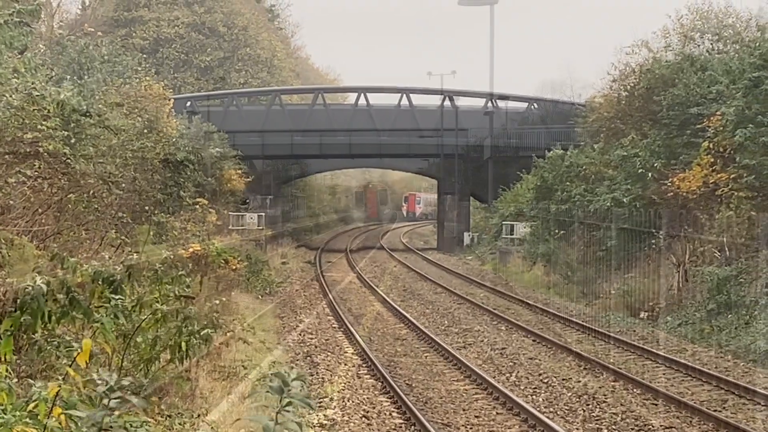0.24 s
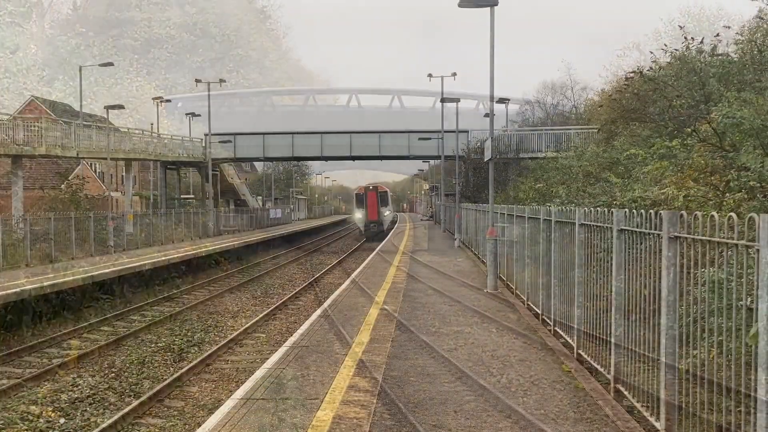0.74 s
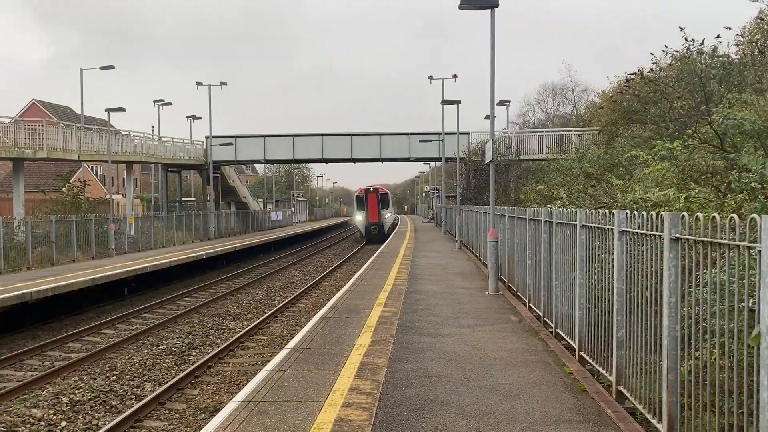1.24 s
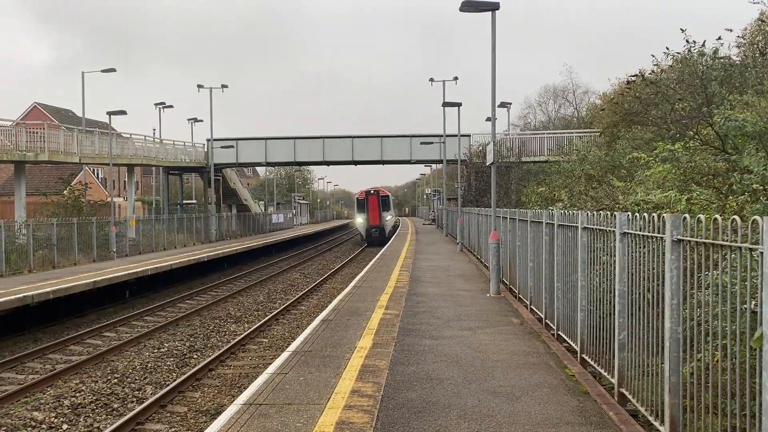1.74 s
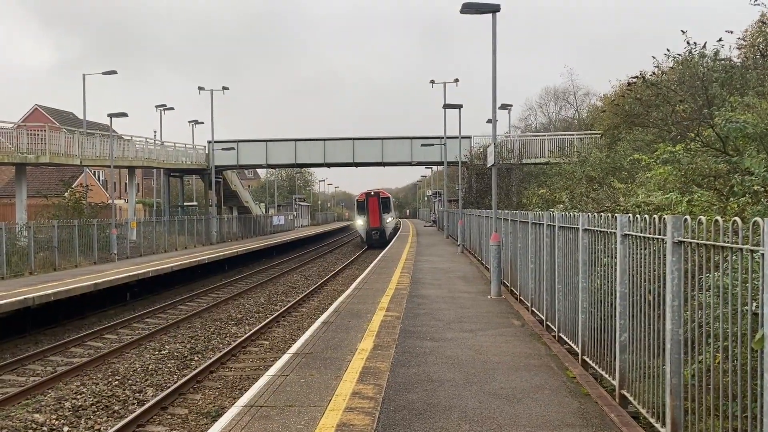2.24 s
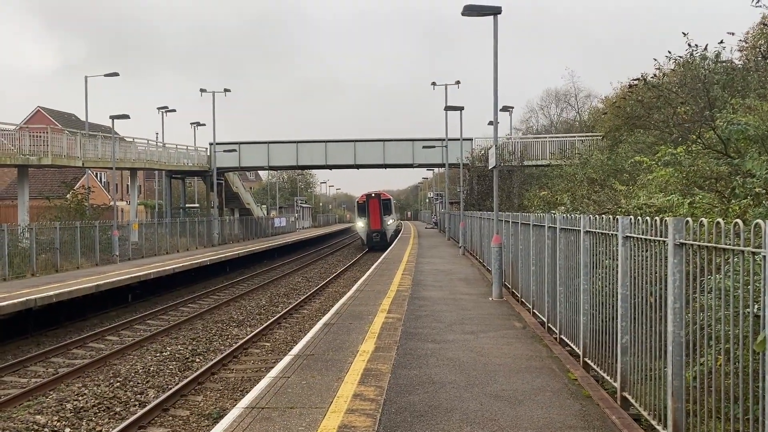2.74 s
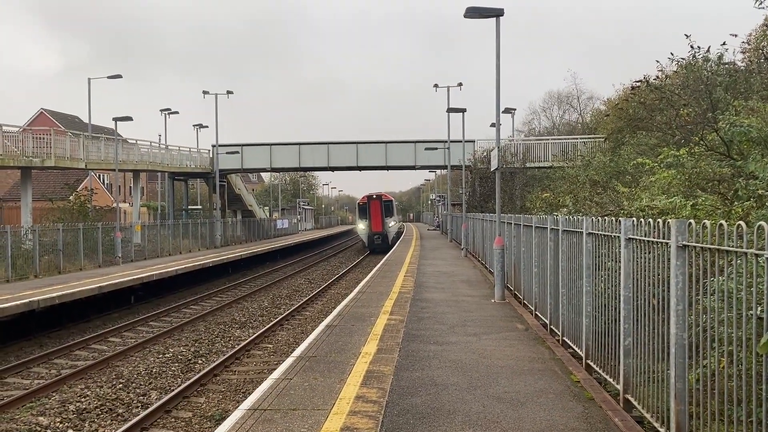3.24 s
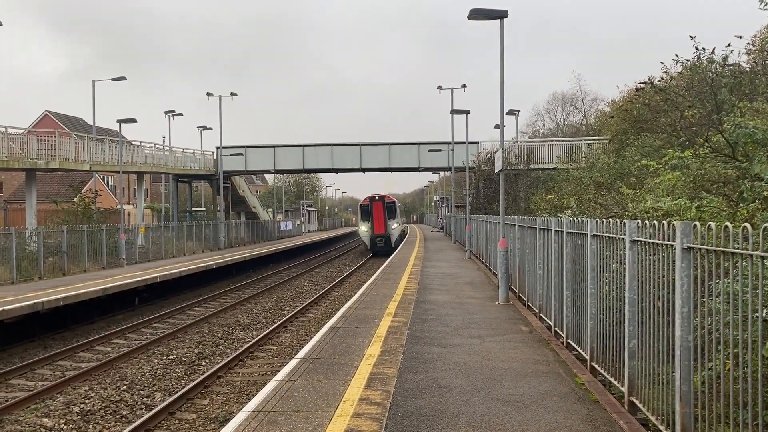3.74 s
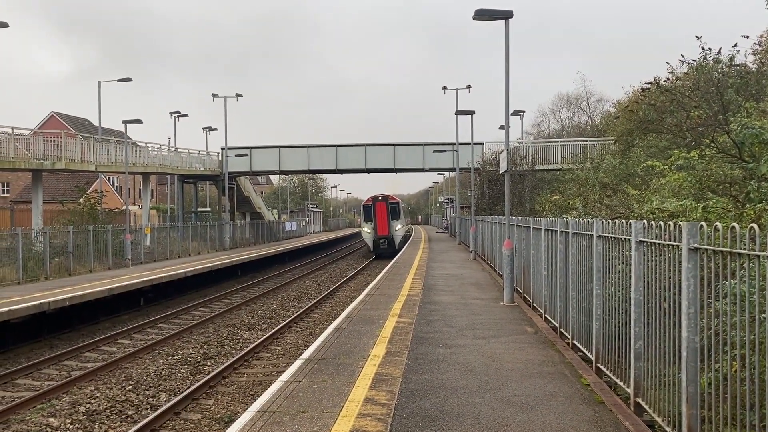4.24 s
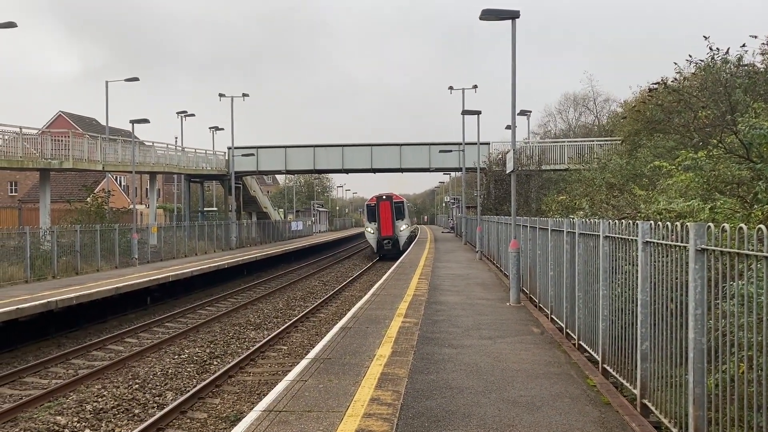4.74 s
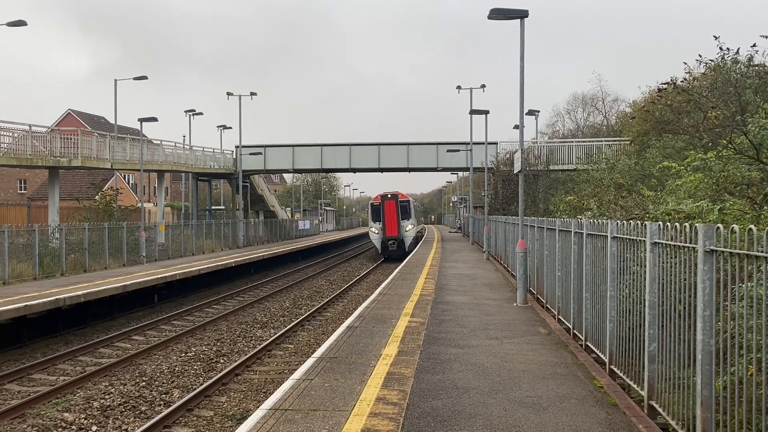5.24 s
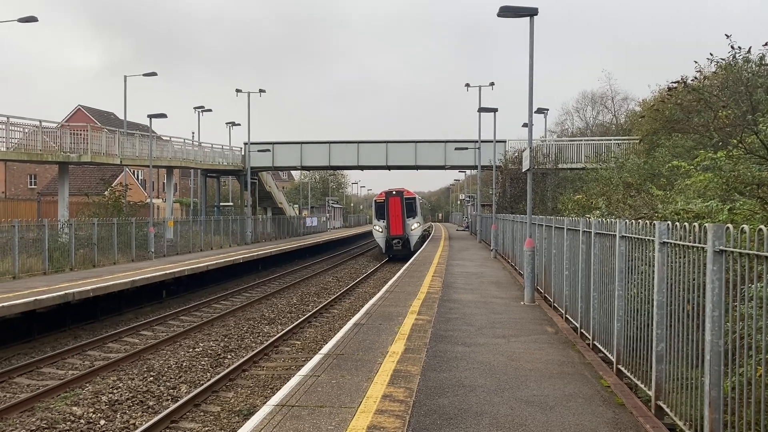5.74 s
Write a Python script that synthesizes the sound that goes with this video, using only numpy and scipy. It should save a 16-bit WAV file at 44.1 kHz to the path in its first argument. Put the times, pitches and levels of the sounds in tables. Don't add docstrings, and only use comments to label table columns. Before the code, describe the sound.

Outdoors, faint distant traffic and low wind thumps open the scene and dissolve within a second into a station platform. A diesel railcar works toward the listener, its two slightly detuned engines throbbing, climbing in pitch, then levelling. Wheel and exhaust roar, wavering fan hum and a very faint late whistle join in. Dry plastic ticks from the hand-held phone sound close; the train never passes.

```python
import sys
import numpy as np
from scipy import signal
from scipy.fft import rfft, irfft, next_fast_len
from scipy.io import wavfile
from scipy.ndimage import uniform_filter1d

SR = 44100
rng = np.random.default_rng(int(sys.argv[2]) if len(sys.argv) > 2 else 0)


def digitize_waveform(pressure):
    field = np.atleast_2d(pressure).T
    bounded = np.clip(field, -1, 1)
    quanta = np.round(bounded * 32767).astype(np.int16)
    wavfile.write(sys.argv[1], SR, quanta)


def decibels_to_gain(level_db):
    exponent = np.asarray(level_db, float) / 20
    return 10 ** exponent


N = 263718
T = np.arange(N) / SR
M = next_fast_len(N + 4096)
HZ = np.arange(M // 2 + 1) * SR / M + 1e-3
DISSOLVE_S = 1

# freq_hz, level_db_per_hz
CUTTING_SPECTRUM = [(300, -1.5), (450, -5), (950, -0.5), (1250, -6), (1850, -6), (2500, -14.5),
                    (4300, -27.5), (6300, -37.5), (6900, -33), (8000, -49), (11000, -41), (12500, -28),
                    (14200, -27), (15600, -21)]
# freq_hz, width_hz, lift_db
TYRE_RINGS = [(950, 28, 10), (1860, 37, 6), (625, 50, 4)]
# start_s, peak_db, pitch_hz, left_minus_right_db
BUFFETS = [(0.009, -34.5, 50.6, -4), (0.039, -51, 66, 2), (0.059, -37, 46, 7), (0.069, -28, 66.6, -4),
           (0.086, -37, 45.8, -9), (0.099, -34, 102, 9), (0.13, -28, 116, 0), (0.145, -33.5, 139, 0),
           (0.161, -30.5, 103, 1), (0.212, -36.5, 51.4, -5), (0.53, -31.5, 58, -1), (0.639, -54, 49, 6),
           (0.789, -38.5, 76, -3),
           (.060, -36.5, 300, 0), (0.069, -30.5, 181, 0.0047), (.095, -38, 183, 0), (.15, -40, 278, 0),
         (0.302, -52, 60, 0), (.575, -43, 70, 0), (.63, -40, 70, 0), (0.43, -40, 79.6, 0),
         (0.691, -43, 100, 0.0066)]

# time_s, mean_firing_hz, load_db
REVS = [(.55, 37.12, -3), (1.05, 41.97, 2.5), (1.3, 45.12, 0.5), (1.5, 46.46, 6), (1.65, 47.24, 4),
        (1.85, 48.94, 1.5), (2.094, 52, 1), (2.43, 55.25, -9.5), (2.85, 60.3, -2.5), (3.232, 65.05, -1.5),
        (3.625, 68.4, 0), (3.85, 69.2, 0.5), (4.6, 69.64, -4.5), (5.2, 70.83, -1), (5.6, 71.4, 2),
        (5.98, 69.8, -1)]
# time_s, gain_db
NEAR = [
    (.3, -6.5),
    (.7, -4.5),
    (1.1, -5),
    (1.6, -3.5),
    (2.1, -2),
    (2.7, -0.43),
    (3.8, 0),
    (4.9, 0.36),
    (5.98, 1),
]
# time_s, both_db
IN_STEP = [(.55, -51.5), (1.05, -44), (1.38, -38.5), (1.65, -34), (1.96, -31.5), (2.19, -36), (2.68, -33),
           (3.02, -28), (3.46, -28.5), (3.80, -28.5), (4.36, -25), (4.85, -23), (5.31, -25.5), (5.66, -28),
           (5.98, -28.5)]
# time_s, front_minus_rear_db
OUT_OF_STEP = [(.92, 3), (1.25, 5), (1.495, 4), (1.78, 15), (2.094, -2), (2.45, 12), (2.818, 7),
               (3.228, -1.5), (3.622, 5), (4.034, 2.5), (4.594, -1.5), (5.12, 1), (5.508, .3), (5.81, 9),
               (6.15, 3)]
# multiple, front_db, rear_db
OVERTONES = [(1.5, -17, -7.5), (2, -1.5, 2), (2.5, -13, -12), (3, 3, -0.5), (3.5, -11.5, -14),
             (4, -6, -8.5), (4.5, -12, -11), (5, -8, -7), (6, -0.5, -4.5)]
# freq_hz, width_hz, lift_db
SILENCER = [(99.4, 8.9, 14.5), (141, 40, -6.5), (211, 30.6, 9), (274, 56, 5), (364, 110, -4)]
# freq_hz, width_hz, lift_db
PIPE_BOOM = [(52, 4.4, 8.5)]

# freq_hz, level_db_per_hz
ROAR_SPECTRUM = [(30, -14), (45, 3), (80, 1), (150, -5), (300, -8), (500, -13.5), (750, -10), (1200, -19),
                 (1750, -25), (3000, -27), (4700, -34), (5300, -38.5), (8000, -43), (15500, -61)]
# freq_hz, width_hz, lift_db
WHEEL_RINGS = [(217, 93, 4), (2142, 300, 8), (4054, 350, 6), (4500, 230, 4), (6330, 1440, 5.5),
               (15000, 1900, 3.5), (15520, 120, 12)]
# freq_hz, side_db
SIDE_DB = [(60, -16), (300, -13.5), (640, -7.5), (1000, -7.5), (1400, 3), (3000, -2.5), (6000, 9),
           (7500, -27), (9000, -86), (16000, -7)]

# freq_hz, phase_wander_rad, level_db
FANS = [(219.1, 0.35, -46.5), (439.3, 0.55, -55.5), (576.3, 0.37, -63), (603.3, 0.41, -59)]
# time_s, tone_220_db, tone_440_db, tone_580_db, tone_600_db
FAN_SWELLS = [(.75, -1, 0.5, 1, 0), (.92, 5.5, 0.5, 0, -1), (1.15, 10.5, -2, 0, 2), (1.35, 1.5, 0.5, 1, 0),
              (1.7, -1.5, -1.5, 1, 3), (2.0, -0.5, -2.5, 0, -0.5), (2.25, 8, -9, -5, 0),
              (2.45, 6, 5.5, -10, -7), (2.7, 0.5, -0.5, 1, 0.5), (3.0, -3, -1.5, -1, -4),
              (3.4, -3, 2, -2, 3.5), (3.7, -1, 3.5, -4, 2.5), (3.95, 0, -2, -3, 1.5), (4.2, 3, -1, -2, -1),
              (4.45, -2, -1.5, 6, 3.5), (4.7, 3.5, -1.5, 4, 4), (4.9, -1.5, 0, 0, 3), (5.1, 7, 1, 1, 3),
              (5.25, -1, -1.5, -3, 1), (5.4, 8, 0.5, -3, 1), (5.55, 1, 0, -4, 4), (5.75, 8.5, -2, -5, -3),
              (5.98, 4, -5, -5, -13)]
# time_s, pitch_hz, level_db
TURBO = [(2.6, 5500, -92), (3, 5900, -88), (3.5, 6350, -81), (3.95, 6770, -75), (4.12, 6850, -83),
         (4.3, 6970, -79), (4.55, 7060, -78), (4.8, 7190, -79), (5.2, 7360, -78), (5.6, 7460, -77),
         (5.98, 7590, -75)]

# start_s, peak_db, ring_hz, snap_db, left_minus_right_db
TICKS = [(1.395, -36, 1030, -64, 2), (1.428, -46, 902, -62, 0), (1.462, -45, 1800, -53.5, -4),
         (1.545, -50, 1090, -60, -3), (1.589, -38, 1300, -57, -12), (1.848, -51, 972, -54, -3),
         (1.8535, -48, 1000, -56, -3), (1.855, -32.5, 1300, -61, -8), (1.865, -45, 902, -69, -3),
         (1.907, -27.5, 1230, -52.5, -6), (1.952, -30, 1000, -53, -8), (2.144, -28, 1150, -50, -8),
         (2.289, -41, 900, -67, -3), (3.285, -32, 955, -60, -3), (3.2916, -26.5, 1100, -48.5, -5),
         (3.331, -36, 900, -62, -2), (3.433, -33, 1468, -57, -4), (3.438, -26, 1600, -54, -8),
         (4.4055, -32.5, 1620, -51.5, -6), (4.415, -26, 1140, -57, -6), (4.845, -30, 900, -60, 0),
         (4.891, -35, 1050, -48.5, -7), (4.894, -34, 902, -57, 0), (4.902, -42, 1010, -61, 0),
         (4.9215, -50, 1000, -66, 0), (4.924, -39, 1400, -53, 2), (4.981, -37, 926, -60, 0),
         (5.004, -28.5, 2300, -45.5, 4), (5.241, -29.5, 902, -58, 2), (5.258, -34, 1200, -54, -9)]
# freq_hz, level_db
CASE_MODES = [(2100, 3.5), (3100, -5.5), (4100, 2), (5300, -11.5), (6400, -3), (7600, -18), (9000, -14)]
SCRAPES_DB = [-2, 24, 36, 26, 31.5, 19, 16]
# centre_s, half_length_s, level_db
RUSTLES = [
    (5.36, 0.087, -70),
    (4.96, .05, -78),
    (5.9, .1, -87),
]

# freq_hz, left_minus_right_db
LEFT_DB = [(60, 1.5), (110, 1.5), (200, 0), (380, 0.5), (700, 3.5), (1290, 2.5), (2380, 1.5), (4400, 1),
           (8120, 1.5), (15000, 0)]
# freq_hz, lead_half_turns
PORT_LEAD = [(0, 0), (500, 0.17), (1000, 0.19), (1500, 0.32), (2500, 0.27), (4500, 0.14), (6800, 0)]
PORT_LAG_S = 2.3e-4
APART = np.array([[1], [-1]])


def curve(table):
    s, *columns = np.transpose(table)
    return [np.interp(T, s, c) for c in columns]


def colour(table, hz):
    table_hz, table_db = np.array(table)[:, 0], np.array(table)[:, 1]
    return np.interp(np.log(hz), np.log(table_hz), table_db)


def lift(peaks, hz):
    return sum(db / (1 + (2 * (hz - f) / width) ** 2) for f, width, db in peaks)


def unit(x):
    return x / np.sqrt(np.mean(x ** 2))


def noise(gain):
    return irfft(rfft(rng.standard_normal(M)) * gain, M)[:N]


def walk(rate_hz):
    k = int(SR / rate_hz)
    held = np.repeat(rng.standard_normal(N // k + 1), k)
    return 1.63 * uniform_filter1d(uniform_filter1d(held, k), k)[:N]


def ports(mid, side, lead=0, left_db=0):
    turn = np.pi / 2 * lead - np.pi * PORT_LAG_S * np.maximum(HZ - PORT_LEAD[-1][0], 0)
    pair = rfft(np.pad(mid + side * APART, ((0, 0), (0, M - N)), "linear_ramp"))
    return irfft(decibels_to_gain(left_db / 2 * APART) * np.exp(1j * turn * APART) * pair, M)[:, :N]


def cutting():
    gain = decibels_to_gain(colour(CUTTING_SPECTRUM, HZ) + lift(TYRE_RINGS, HZ)) * (HZ > 250)
    mid = noise(gain) * decibels_to_gain(.5 * walk(40))
    side = .25 * noise(gain)
    far = decibels_to_gain(-48.5) * ports(mid, side) / np.sqrt(np.mean(mid ** 2))
    passing_db, passing_s = 2.5, 0.21
    passing = uniform_filter1d(far, size=5) * (decibels_to_gain(passing_db * np.exp(-(T / passing_s) ** 2)) - 1)
    gusts = [decibels_to_gain(2.5 * walk(20)) for _ in range(2)]
    wind_gain = 1 / (1 + (HZ / 130) ** 2) * (HZ > 35)
    wind = decibels_to_gain(-44.5) * np.array([unit(noise(wind_gain)) * g for g in gusts])
    hum = decibels_to_gain(-56) * np.sin(2 * np.pi * 121 * T + .4 * walk(9))
    fade_out = np.clip(1 - T / DISSOLVE_S, 0, 1) ** 1.15
    out = hum * np.clip(1.4 - T, 0, 1) + (far + passing + wind) * fade_out
    for s, db, hz, pan_db in BUFFETS:
        t = T - s - 0.47 / hz
        puff = np.exp(-(t * hz / 0.74) ** 2) * np.cos(2 * np.pi * hz * t + 0.2 * APART)
        out += decibels_to_gain(db + pan_db / 2 * APART) * puff
    return out


def engines():
    hz, load_db = curve(REVS)
    near_db, = curve(NEAR)
    both_db, = curve(IN_STEP)
    front_db, = curve(OUT_OF_STEP)
    turns_s = np.array([IN_STEP, OUT_OF_STEP])[:, :, 0].T.ravel()
    slip = np.pi / 2 * np.interp(T, turns_s, np.arange(len(turns_s)))
    sag_db = -0.5
    both_db = both_db + lift(PIPE_BOOM, hz) + sag_db * np.sin(slip) ** 2
    front_share = 1 / (1 + decibels_to_gain(-front_db))
    low_bark_db = -56 + 1.75 * near_db
    high_bark_db = -57 + 2 * near_db
    out = 0
    for side, share in ((1, front_share), (-1, 1 - front_share)):
        phase = 2 * np.pi * np.cumsum(hz) / SR + side * slip
        rate_hz = uniform_filter1d(np.gradient(phase), 4000) * SR / (2 * np.pi)
        out = out + np.sqrt(2) * decibels_to_gain(both_db + .5 * walk(20)) * share * np.sin(phase)
        for k, overtone_front_db, overtone_rear_db in OVERTONES:
            bark_db = high_bark_db if k > 2 else low_bark_db
            overtone_db = overtone_rear_db if side < 0 else overtone_front_db
            gain = decibels_to_gain(load_db + bark_db + overtone_db + lift(SILENCER, k * rate_hz) + 1.6 * walk(7))
            out = out + np.sqrt(2) * gain * 2 * share * np.sin(k * phase + .3 * walk(8))
    return out


def roar():
    near_db, = curve(NEAR)
    tilt_db = 0.77 * np.maximum(near_db + 0.5, 0)
    air_db = 3 + 0.8 * near_db
    shape = decibels_to_gain(colour(ROAR_SPECTRUM, HZ) + lift(WHEEL_RINGS, HZ))
    shape = shape / np.sqrt(np.sum(shape[(HZ > 650) & (HZ < 1000)] ** 2) / len(HZ))
    side_gain = decibels_to_gain(colour(SIDE_DB, HZ) - 1.66 * lift(WHEEL_RINGS, HZ))
    pair = rfft(rng.standard_normal((2, M))) * shape * [np.ones(len(HZ)), side_gain]
    out, swell_db = np.zeros((2, N)), 0.47 * walk(40)
    for octave in np.arange(-9, 10) / 2:
        band = np.cos(np.pi * np.clip(np.log2(HZ / 800) - octave, -.5, .5)) ** 2
        rumble_db = 2.5 * (-2.5 < octave < -1)
        band_db = -52 + near_db + tilt_db * max(octave, 0) + rumble_db + air_db * (octave > 3)
        out += decibels_to_gain(band_db + swell_db + 0.67 * walk(12)) * irfft(pair * band, M)[:, :N]
    return out


def fans():
    near_db, = curve(NEAR)
    load_db = curve(REVS)[1]
    low_db = -0.44 + 1.64 * near_db + 0.38 * load_db
    high_db = 1.5 - 0.1 * near_db
    gaining_m_s2, sound_m_s = .7, 343
    heard_s = T + gaining_m_s2 / sound_m_s * (T - 3) ** 2 / 2
    out = 0
    for (hz, wander_rad, db), swell_db in zip(FANS, curve(FAN_SWELLS)):
        gain = decibels_to_gain(db + swell_db + (low_db if hz < 300 else high_db) + 1.2 * walk(16))
        out = out + gain * np.sqrt(2) * np.sin(2 * np.pi * hz * heard_s + wander_rad * walk(18))
    return out


def turbocharger():
    hz, db = curve(TURBO)
    whistle = np.sin(2 * np.pi * np.cumsum(hz + 35 * walk(120)) / SR)
    return np.sqrt(2) * decibels_to_gain(db + 2.5 + 2 * walk(30)) * whistle


def ticks():
    out, t = np.zeros((2, M)), np.arange(2048) / SR
    top = signal.butter(2, (6500, 15500), "band", fs=SR, output="sos")
    soft = signal.butter(3, 10500, fs=SR, output="sos")
    first_scrape, snap_s, spit_db, thud_db = 21, .00045, -10, -41
    scrapes_db = np.zeros(len(TICKS))
    scrapes_db[first_scrape:first_scrape + len(SCRAPES_DB)] = SCRAPES_DB
    grits = rng.standard_normal((len(TICKS), 2, 2048))
    for (s, db, hz, snap_db, pan_db), scrape_db, grit in zip(TICKS, scrapes_db, grits):
        ring = -np.sin(2 * np.pi * hz * t) * np.exp(-t / 0.00049) * (1 - np.exp(-t / 0.00014)) * 1.54
        ring = ring + .75 * np.sin(2 * np.pi * 560 * t) * np.exp(-t / .002)
        modes = [decibels_to_gain(mode_db) * np.sin(2 * np.pi * mode_hz * (1 + 0.03 * g) * t)
                 for (mode_hz, mode_db), g in zip(CASE_MODES, grit[0])]
        snap = sum(modes) * np.exp(-t / snap_s)
        spit = signal.sosfilt(top, (t == 0) + .3 * grit[1] * np.exp(-t / .0003))
        spit = spit / np.max(np.abs(spit))
        thud = np.sin(2 * np.pi * 140 * t) * np.exp(-t / 0.0048) * [[.4], [.8]]
        treble = decibels_to_gain(snap_db + 9) * signal.sosfilt(soft, snap)
        treble = treble + decibels_to_gain(snap_db + spit_db + scrape_db + 4) * spit
        lean = (decibels_to_gain(pan_db) - 1) / (decibels_to_gain(pan_db) + 1)
        i = int((s + .0009) * SR)
        out[:, i:i + 2048] += (decibels_to_gain(db) * ring + treble) * [[1], [lean]] + decibels_to_gain(thud_db) * thud
    return ports(*out[:, :N], np.interp(HZ, *np.transpose(PORT_LEAD)))


def rustles():
    cloth = unit(noise((HZ > 7000) / (1 + (HZ / 13000) ** 4))) * decibels_to_gain(3 * walk(150))
    strokes = sum(decibels_to_gain(db) * np.exp(-((T - s) / half_s) ** 2) for s, half_s, db in RUSTLES)
    return ports(cloth * strokes, 0)


def scene():
    fade_in = np.clip(T / DISSOLVE_S, 0, 1)
    breeze, engine = cutting(), engines()
    mid, side = roar()
    lead, left_db = np.interp(HZ, *np.transpose(PORT_LEAD)), colour(LEFT_DB, HZ)
    train = ports(engine + fade_in * (mid + fans() + turbocharger()), fade_in * side, lead, left_db)
    return breeze + train + ticks() + rustles()


def band_limit(x):
    return signal.sosfilt(signal.butter(12, 16790, fs=SR, output="sos"), x)


def record(dry):
    bass_cut = signal.butter(2, 28, "high", fs=SR, output="sos")
    top_cut = signal.ellip(10, .3, 80, 15700, fs=SR, output="sos")
    fade_s = .005
    dry = dry * np.sin(np.pi / 2 * np.clip((T[-1] - T) / fade_s, 0, 1)) ** 2
    mix = signal.sosfilt(np.vstack([bass_cut, top_cut]), dry)
    return band_limit(mix)


dry = scene()
out = record(dry)
digitize_waveform(out)
```